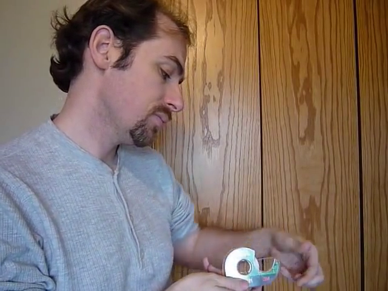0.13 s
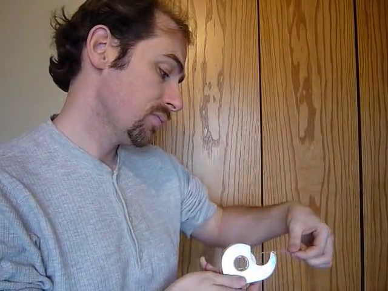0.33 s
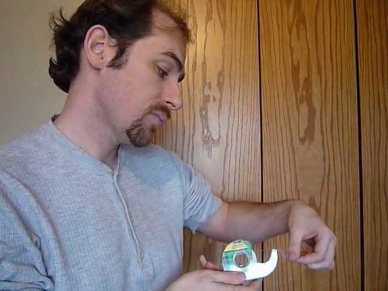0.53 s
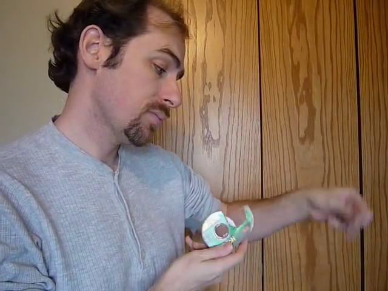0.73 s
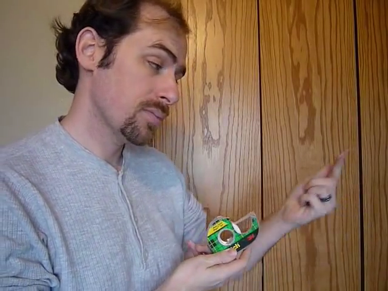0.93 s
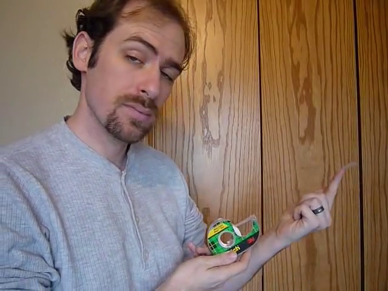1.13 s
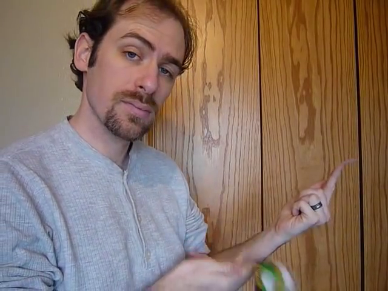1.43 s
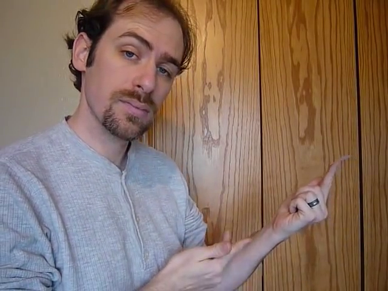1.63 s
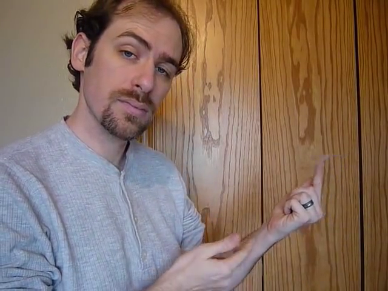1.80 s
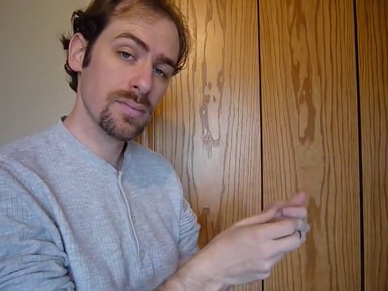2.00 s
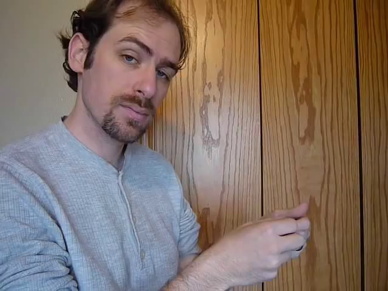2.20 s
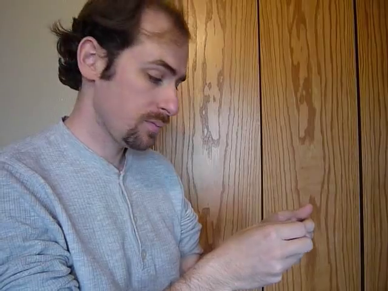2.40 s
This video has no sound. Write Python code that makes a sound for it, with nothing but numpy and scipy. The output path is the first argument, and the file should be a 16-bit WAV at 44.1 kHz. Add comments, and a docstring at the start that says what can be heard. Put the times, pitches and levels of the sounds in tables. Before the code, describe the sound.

Sticky tape is torn off a hand-held plastic dispenser with a crisp snap close to the microphone; a second later the dispenser falls farther off, knocking, bouncing and rattling to rest in a small hissing room.

```python
"""Tape dispenser torn and dropped

Small room, hand-held plastic dispenser: sticky tape snaps off close to the microphone, as noise and
rapid tooth impulses ringing the dispenser. It slips and falls farther off: impulses ring its shell, low
pushes boom in the surface, random contacts rattle and wavering sines drone as its loose roll settles.
Shaped noise makes a steady hiss with a faint fan-like whirr under it all."""
import sys
import numpy as np
from scipy import signal
from scipy.fft import rfft, irfft, next_fast_len
from scipy.io import wavfile

SR = 44100
rng = np.random.default_rng(int(sys.argv[2]) if len(sys.argv) > 2 else 0)


def wav_out(sig):
    """Save sig, one row per channel (or a flat mono array), as 16-bit PCM at SR to the path in sys.argv[1]."""
    wavfile.write(sys.argv[1], SR, np.round(np.clip(np.atleast_2d(sig).T, -1, 1) * 32767).astype(np.int16))


N = 112454  # samples in the scene
EVENT_SIZE = 16384  # samples in one event, long enough for it to die away


def amp(db):
    """Decibels to gain."""
    return 10 ** (np.asarray(db) / 20)


def unit(x):
    """Scales to rms 1."""
    return x / np.sqrt(np.mean(x ** 2) + 1e-20)


def read(points, hz):
    """Reads a table of values against frequency, interpolated on a log-frequency axis."""
    f, value = np.transpose(points)
    return np.interp(np.log(hz + 1), np.log(f), value)


def clock():
    """Time in seconds since the start of an event."""
    return np.arange(EVENT_SIZE) / SR


def decay(t, t60):
    """Exponential fall by 60 dB in t60 seconds."""
    return np.exp(-np.log(1000) * t / t60)


def click(s):
    """One unit impulse, s seconds after the start of an event."""
    return 1. * (np.arange(EVENT_SIZE) == max(round(s * SR), 0))


def through(x, response):
    """Convolves and keeps the length."""
    return signal.fftconvolve(x, response)[:len(x)]


def add(mix, s, sound):
    """Places a sound in the mix at s seconds."""
    part = mix[round(s * SR):][:len(sound)]
    part += sound[:len(part)]


def noise(gain):
    """Noise of rms 1 whose spectrum follows the function gain(hz)."""
    size = next_fast_len(N, True)
    spectrum = rfft(rng.standard_normal(size)) * gain(np.fft.rfftfreq(size, 1 / SR))
    return unit(irfft(spectrum, size)[:N])


def band(hz, width_hz):
    """Noise in one resonance."""
    return noise(lambda f: 1 / (1 + ((f - hz) / (width_hz / np.sqrt(2))) ** 2))


def causal(level_db, size=4096):
    """Shortest (minimum-phase) response with the spectrum level_db(hz), scaled to energy 1."""
    hz = abs(np.fft.fftfreq(size, 1 / SR))
    log_gain = np.log(amp(np.maximum(level_db(hz), -80)))
    response = np.fft.ifft(np.exp(np.conj(signal.hilbert(log_gain)))).real
    return response / np.linalg.norm(response)


def ring(modes):
    """Dying sines of a struck object."""
    t = clock()[:EVENT_SIZE // 2]
    return sum(amp(db) * decay(t, t60) * np.sin(2 * np.pi * hz * t) for hz, db, t60 in modes)


def body(colour, modes):
    """An object's answer to one contact: a short coloured crack plus ringing modes."""
    response = ring(modes)
    add(response, 0, causal(lambda f: read(colour, f)))
    return response


CORNER_OCTAVES = 0.22  # distance from the centre at which the boost in dB has halved


def corner(hz, db):
    """Each corner of the shell favours its own part of the treble."""
    return causal(lambda f: db / (1 + (np.log2((f + 1) / hz) / CORNER_OCTAVES) ** 2))


def contacts(per_s, spread_db, size=2048):
    """Small contacts of random sign and strength, one somewhere in every interval."""
    at = ((np.arange(size) + rng.random(size)) * SR / per_s).astype(int)
    strength = rng.choice([-1., 1.], size) * amp(spread_db * rng.standard_normal(size))
    inside = at < EVENT_SIZE
    return np.bincount(at[inside], strength[inside], EVENT_SIZE)


# Steady hiss of the place. Each row: frequency in Hz, relative density in dB per Hz.
HISS_COLOUR = [(30, -17), (70, -21), (110, -2), (170, -9), (280, 1.5), (390, -2), (600, 1), (800, -3.5),
               (1400, -6), (2800, -10), (6000, -11.5), (8000, -18), (9500, -28), (10500, -46)]
# Faint fan-like whirr within it. Each row: frequency in Hz, width in Hz, level in dB rms.
WHIRR_BANDS = [(1740, 180, -58.5), (2300, 300, -60.5), (3310, 250, -67), (3840, 56, -69)]
HISS_DB = -51.5  # rms


def background():
    """Even hiss with a few faint whirring bands, all steady filtered noise."""
    hiss = amp(HISS_DB) * noise(lambda f: amp(read(HISS_COLOUR, f)))
    whirr = sum(amp(db) * band(hz, width_hz) for hz, width_hz, db in WHIRR_BANDS)
    return hiss + whirr


# Reverberation of the small room. Each row: frequency in Hz, t60 in seconds.
ROOM_T60 = [(150, .3), (500, 0.14), (1400, 0.17), (3500, 0.19), (5500, 0.19), (10000, 0.17)]
# Early reflections. Each row: delay in seconds, gain.
EARLY_ECHOES = [(.0014, 0.26), (.0035, 0.45), (.0085, .2), (0.0123, 0.27)]
ROOM_ONSET_S = .002
ROOM_DB, THUD_ROOM_DB, HELD_ROOM_DB = 0.5, -1.5, -5.5  # tail level for shell, thuds and tear


def room(x, wet_db):
    """A few near reflections, then a diffuse tail in which each band dies at its own speed."""
    hz, t, z = signal.stft(rng.choice([-1., 1.], EVENT_SIZE), SR, nperseg=256)
    dying = z * decay(t, read(ROOM_T60, hz)[:, None])
    tail = signal.istft(dying, SR, nperseg=256)[1]
    tail *= 1 - np.exp(-(clock() / ROOM_ONSET_S) ** 2)
    early = sum(gain * click(s) for s, gain in EARLY_ECHOES)
    return through(x, click(0) + early + amp(wet_db) * tail / np.linalg.norm(tail))


# Drone of the rocking roll. Each row: frequency in Hz, width in Hz, level in dB rms before the fades.
ROLL_DRONE = [(446, 15.6, -42.5), (514, 23.4, -44), (592, 31, -49.5)]
ROLL_FROM_S, ROLL_TO_S, ROLL_RISE_S, ROLL_T60_S = 2.05, 2.198, 0.027, 0.19


def roll():
    """A hollow drone of sines with wandering phase, held while the dispenser rocks, then dying away."""
    t = clock()
    after_rocking = np.maximum(ROLL_FROM_S + t - ROLL_TO_S, 0)
    level = np.minimum(t / ROLL_RISE_S, 1) * decay(after_rocking, ROLL_T60_S)
    drone = 0
    for hz, width_hz, db in ROLL_DRONE:
        waver = np.cumsum(rng.standard_normal(len(t))) * np.sqrt(2 * np.pi * abs(width_hz) / SR)
        drone = drone + amp(db) * unit(np.sin(2 * np.pi * hz * t + waver))
    return ROLL_FROM_S, level * drone


# Strength of the rattle as it rocks to rest. Each row: time in seconds, level of the contacts in dB.
RATTLE_LEVEL = [(2.051, -18), (2.077, -11.5), (2.098, -18), (2.116, -21), (2.129, -24), (2.152, -12.5),
                (2.172, -16.5), (2.189, -12.5), (2.211, -27)]
# Colour of the rattle. Each row: frequency in Hz, relative level in dB.
RATTLE_SPECTRUM = [(100, -43), (700, -12.5), (1100, -11.5), (2100, -14.5), (2800, -3.5), (3800, -1.5),
                   (5100, -1), (6500, -7), (8000, -13), (10500, -27)]
# Modes of the plastic shell, also rung by the knocks. Each row: frequency in Hz, level in dB, t60 in seconds.
SHELL_RING = [(1048, -48.5, 0.17), (1956, -45, 0.09), (2770, -43, 0.097), (3630, -59, 0.12),
              (4080, -58, 0.04), (4710, -48, 0.2), (5070, -47, 0.13), (5335, -68, 0.12), (5660, -56, 0.067),
              (5930, -43.5, .15), (7560, -43, 0.095)]
# Part of the treble that each rattling corner favours. Each entry: frequency in Hz.
RATTLE_CORNERS = [3700, 5000, 6200]
RATTLE_PER_S, RATTLE_SPREAD_DB, RATTLE_CORNER_DB = 450, 3.5, 4


def rattle():
    """Quick light contacts on one corner or another while the dispenser rocks to rest."""
    s, db = np.transpose(RATTLE_LEVEL)
    level = np.interp(s[0] + clock(), s, amp(db), right=0)
    force = level * contacts(RATTLE_PER_S, RATTLE_SPREAD_DB)
    which = rng.integers(0, len(RATTLE_CORNERS), EVENT_SIZE)
    taps = 0
    for k, hz in enumerate(RATTLE_CORNERS):
        tap = through(force * (which == k), corner(hz, RATTLE_CORNER_DB))
        taps = taps + room(tap, ROOM_DB)
    return s[0], through(taps, body(RATTLE_SPECTRUM, SHELL_RING))


# Heavier blows on the surface. Each row: start in seconds, level in dB, centre in Hz, width in octaves.
SURFACE_BLOWS = [(1.7536, -1, 650, 0.72), (1.7574, -8, 413, 0.29), (1.9482, -5.5, 830, 0.93)]
# Modes of that surface. Each row: frequency in Hz, level in dB, t60 in seconds.
SURFACE_RING = [(127, -34.5, 0.11), (248, -52.5, 0.34), (373, -44.5, 0.045), (450, -48, .1),
                (608, -45.5, 0.062), (678, -40.5, 0.058), (890, -45, .07), (1048, -37, 0.023),
                (1498, -44.5, 0.12)]
THUD_LOW_HZ = 111  # the push weakens below this


def thud(s, db, hz, octaves):
    """A soft push of the falling dispenser booms in the surface that it lands on."""
    def push_db(f):
        hump = 1 + (np.log2((f + 1) / hz) / octaves) ** 2
        low_cut = np.hypot(1, THUD_LOW_HZ / (f + 1))
        return -20 * np.log10(hump * low_cut)

    force = amp(db) * through(click(0), causal(push_db))
    return s, room(force + through(force, ring(SURFACE_RING)), THUD_ROOM_DB)


# A tick in the hand, then the fall. Each row: start in seconds, click in dB, chatter in dB,
# chatter decay in seconds, frequency that this corner favours in Hz, its boost in dB.
SHELL_KNOCKS = [(.0754, -20.5, -24, 0.0031, 3800, 8), (1.7549, -8, .5, 0.0027, 5960, 3),
                (1.9492, -13, -1, 0.0072, 6600, 3.5), (1.9581, -10, -6.5, 0.0045, 6140, 2),
                (2.0465, 3, 0, 0.0037, 5000, 3.5), (2.108, -4, -4, 0.011, 6530, 6),
                (2.1344, 1.5, -2, 0.0067, 3200, 12)]
# Colour of the plastic shell. Each row: frequency in Hz, relative level in dB.
SHELL_COLOUR = [(60, -11.5), (250, -24), (700, -21), (1050, -1), (1400, -13.5), (2000, -4), (3100, -7),
                (4000, -2), (5100, 0.5), (6200, -2), (7500, -8), (9000, -12.5), (10500, -40.5)]
CHATTER_PER_S = 3500


def knock(s, click_db, chatter_db, decay_s, corner_hz, corner_db):
    """A sharp click on one corner of the shell, with the loose parts chattering briefly."""
    chatter = contacts(CHATTER_PER_S, spread_db=2.0) * np.exp(-clock() / decay_s)
    force = amp(click_db) * click(0) + amp(chatter_db) * chatter / np.linalg.norm(chatter)
    struck_shell = through(body(SHELL_COLOUR, SHELL_RING), corner(corner_hz, corner_db))
    return s, room(through(force, struck_shell), ROOM_DB)


# Colour of the tear, close to the microphone. Each row: frequency in Hz, relative level in dB.
TEAR_SPECTRUM = [(100, -37), (600, -17), (1350, -5.5), (1750, -5), (2100, 3.5), (2600, 0), (4000, -1.5),
                 (4900, -3.5), (5800, -1.5), (8000, -12), (10500, -25)]
# Modes of the held dispenser, plucked by the tear. Each row: frequency in Hz, level in dB, t60 in seconds.
HELD_RING = [(1405, -38, 0.066), (2014, -38.5, 0.081), (2200, -40.5, .1), (3000, -51, 0.043),
             (3770, -45, .05), (4140, -34, .06), (5500, -34, 0.072), (5780, -35, 0.049)]
TEAR_S, TEAR_LENGTH_S = 0.6783, .0058
TEETH_HZ, TEETH_JITTER = 2096, 0.076  # jitter as a fraction of the spacing
TEAR_DB, TEAR_RISE_DB = -5.5, 15.5  # level where the tape parts, and the rise up to it
TEAR_FIZZ_DB, TEAR_FIZZ_DECAY_S = 0, 0.0043


def tape():
    """Tape gives way tooth by tooth, louder until it parts, with a short fizz, and plucks the dispenser."""
    steps = np.arange(0, TEAR_LENGTH_S, 1 / TEETH_HZ)
    slips = steps + TEETH_JITTER / TEETH_HZ * rng.standard_normal(64)[:len(steps)]
    force = sum(amp(TEAR_DB + TEAR_RISE_DB * (s / TEAR_LENGTH_S - 1)) * click(s) for s in slips)
    # the fizz swells up to the parting and fades after it
    fizz = rng.standard_normal(EVENT_SIZE) * np.exp(-abs(clock() - TEAR_LENGTH_S) / TEAR_FIZZ_DECAY_S)
    force += amp(TEAR_FIZZ_DB) * fizz / np.linalg.norm(fizz)
    return TEAR_S, room(through(force, body(TEAR_SPECTRUM, HELD_RING)), HELD_ROOM_DB)


def scene():
    """The tape is torn near the microphone; the fall is farther off and wetter."""
    mix = background()
    events = [tape(), rattle(), roll()]
    events += [thud(*row) for row in SURFACE_BLOWS]
    events += [knock(*row) for row in SHELL_KNOCKS]
    for s, sound in events:
        add(mix, s, sound)
    return mix[None]


EDGE_HZ = 10800
OFFSET = -.047  # of full scale


def record(dry):
    """The recorder's band limit, a steep low-pass, and its small constant offset."""
    low_pass = signal.firwin(401, EDGE_HZ, window=("kaiser", 8), fs=SR)
    return signal.oaconvolve(dry, low_pass[None], "same") + OFFSET


dry = scene()
out = record(dry)
wav_out(out)
```